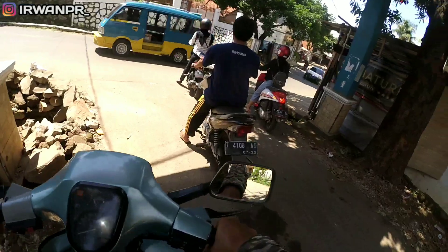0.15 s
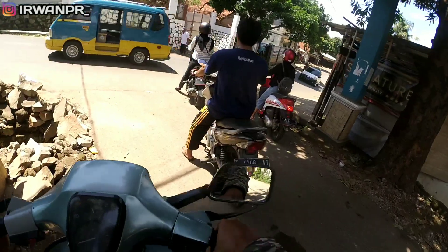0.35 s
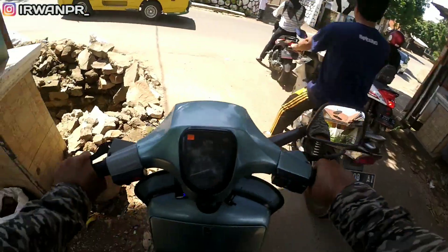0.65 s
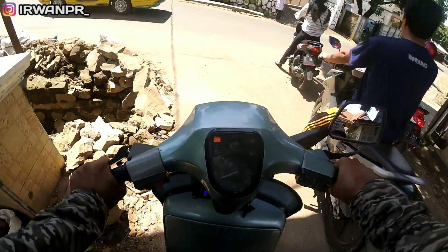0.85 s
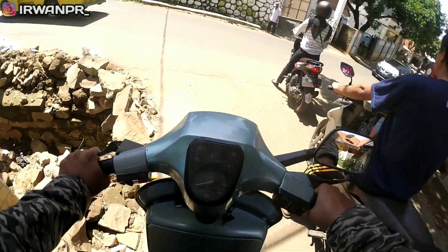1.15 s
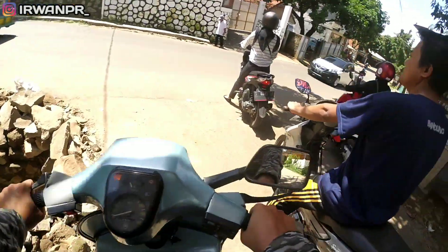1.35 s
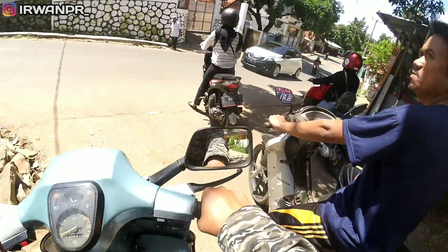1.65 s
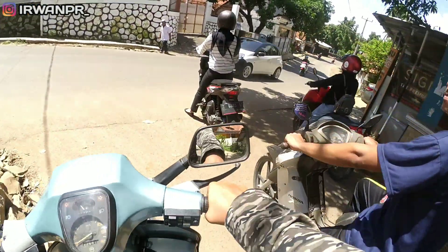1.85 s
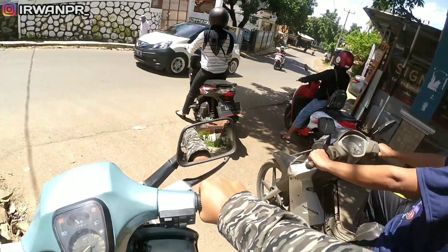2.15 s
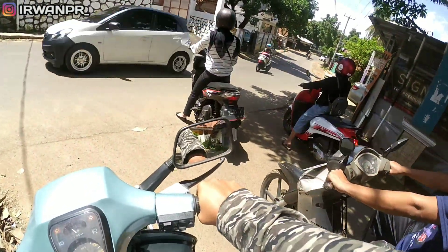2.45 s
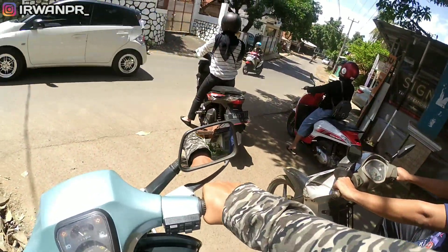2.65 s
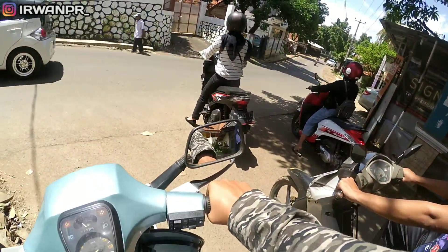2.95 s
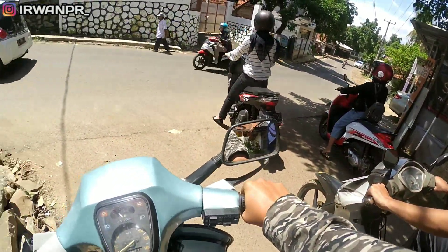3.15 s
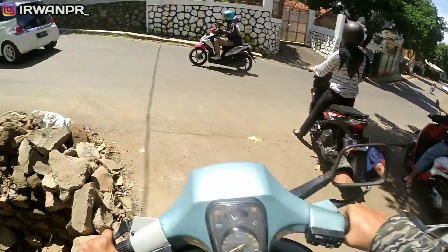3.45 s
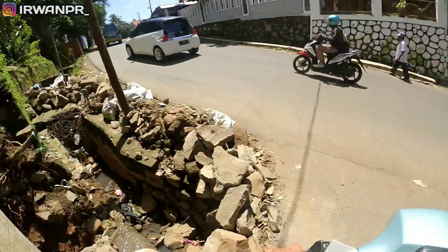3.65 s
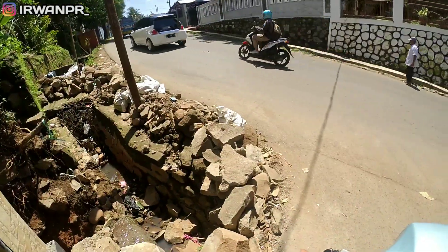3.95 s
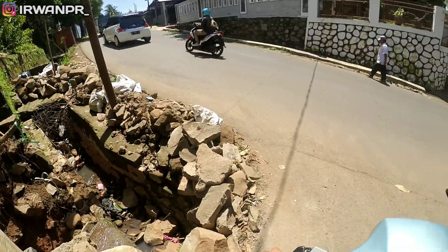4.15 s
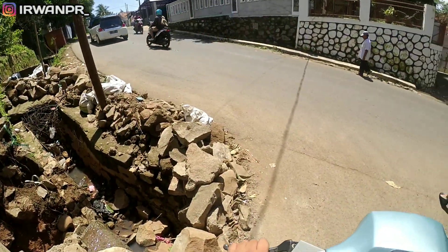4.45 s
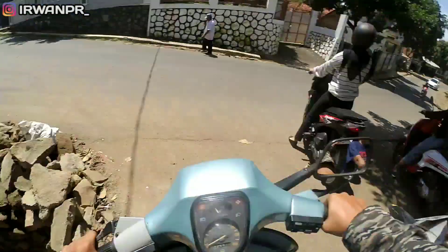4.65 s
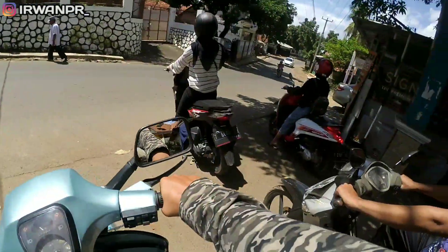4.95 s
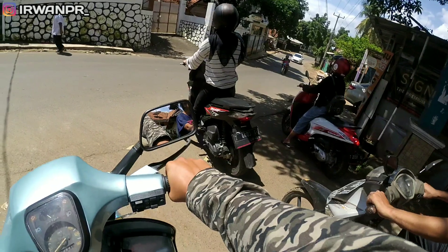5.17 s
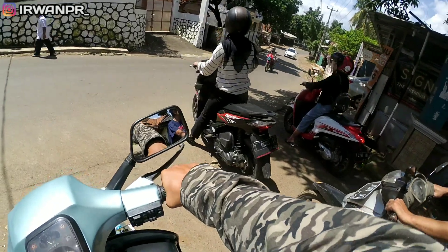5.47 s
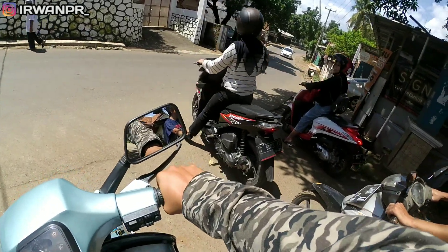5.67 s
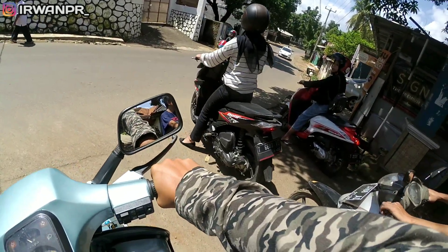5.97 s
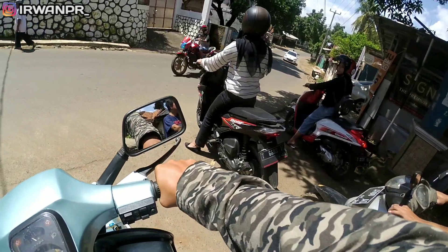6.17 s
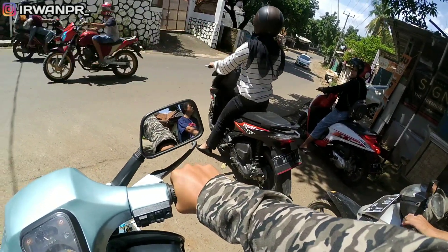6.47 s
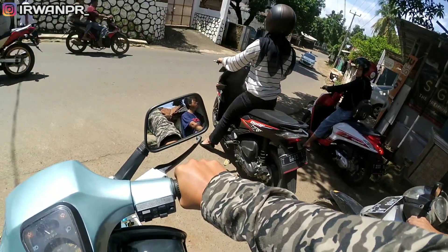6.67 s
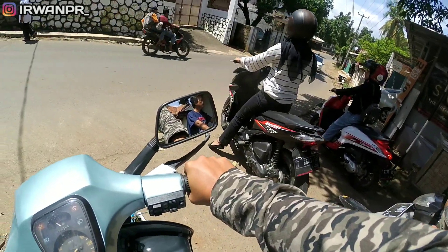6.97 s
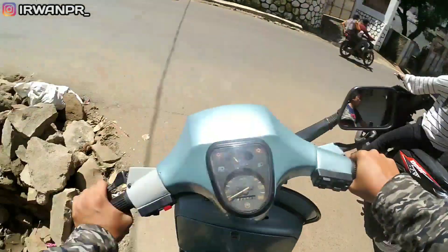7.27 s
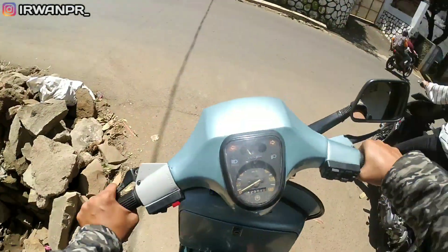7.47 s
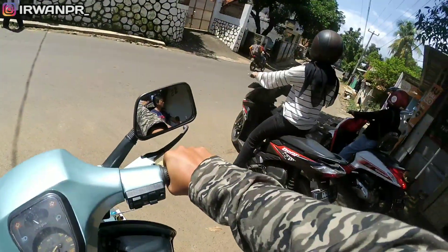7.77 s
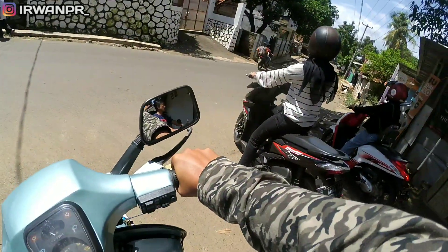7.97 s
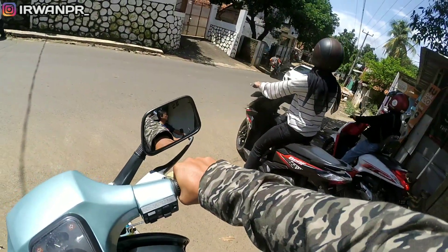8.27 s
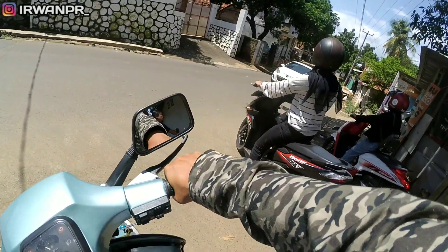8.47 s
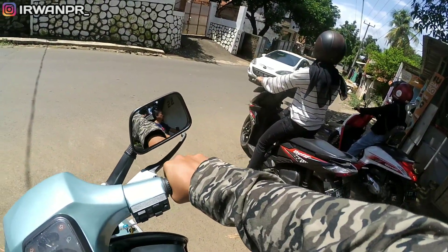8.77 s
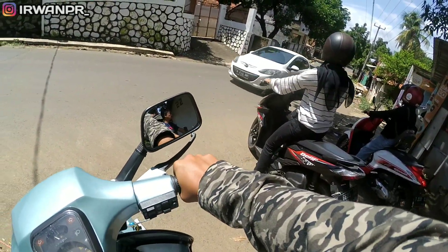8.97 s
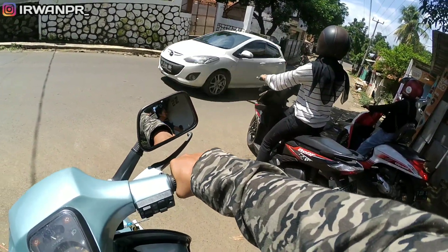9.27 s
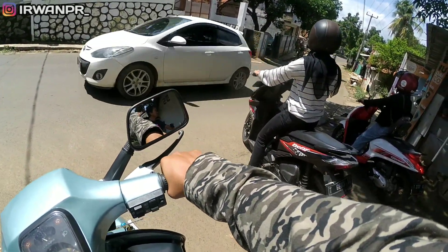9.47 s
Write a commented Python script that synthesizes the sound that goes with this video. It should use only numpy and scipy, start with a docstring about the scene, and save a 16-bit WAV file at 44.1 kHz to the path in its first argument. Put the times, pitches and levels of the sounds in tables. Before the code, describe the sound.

From inside a helmet: an uneven two-stroke scooter idle, a motorbike climbing in pitch, another revving with ticking valves, over low traffic rumble.

```python
"""A motorbike at a village junction revs up, holds and eases off: a stack of tones, ticking valves, a rattle.
A second one pulls away with rising pitch, a van drones past, others blip or hum: stacks of tones too.
The waiting scooter under the helmet microphone idles with uneven pops: short bursts of coloured noise.
Small metal parts clink as dying tones, thin squeaks chirp, and shaped noise makes the traffic.
The helmet muffles engine tones above about 410 Hz."""
import sys
import numpy as np
from scipy import signal
from scipy.fft import rfft, irfft, next_fast_len
from scipy.io import wavfile
from scipy.ndimage import uniform_filter1d, map_coordinates

SR = 44100
rng = np.random.default_rng(int(sys.argv[2]) if len(sys.argv) > 2 else 0)


def output_pcm(signal):
    """Save a mono or channel-first signal as 16-bit PCM at the path in sys.argv[1].

    Samples are clipped to [-1, 1] before scaling.
    """
    pcm = np.clip(np.atleast_2d(signal).T, -1, 1) * 32767
    wavfile.write(sys.argv[1], SR, np.round(pcm).astype(np.int16))


N = 424241
TIME = np.arange(N) / SR
TOP_HZ = 15330  # nothing is kept from here up

# "Order 4" is a tone at 4 times the firing rate. Noise colours are only shapes: the noise is then set to rms 1.

# the revving motorbike; the last two levels are bases for several orders:
# (time [s], firing rate [Hz], order 2 [dB], order 4 [dB], order 6 [dB], order 8 [dB],
#  order 10 and base up to 14 [dB], base of the odd orders [dB])
REVVING = [(2.5, 20.56, -61, -46, -55, -60, -55, -60), (2.75, 22.55, -56, -33, -43, -48, -47, -55),
           (2.95, 25.51, -40, -27, -34, -40, -39, -54), (3.15, 28.27, -43, -28, -35, -35, -42, -50),
           (3.3, 29.1, -37, -27, -42, -33, -46, -45), (3.6, 28.52, -41, -25, -32, -36, -50, -50),
           (3.8, 28.26, -40, -25, -33, -38, -54, -54), (4.05, 28.74, -42, -33, -33, -39, -57, -54),
           (4.3, 32.8, -33, -39, -30, -36, -45, -52), (4.55, 34.2, -32, -39, -32, -44, -54, -55),
           (4.8, 34.37, -35.5, -45, -39, -54, -46, -55), (5.1, 34.97, -39, -40, -37, -54, -52, -55),
           (5.45, 34.64, -41.5, -50, -36, -45, -52, -53), (5.56, 33.91, -41.5, -54, -47, -49, -52, -53),
           (6.1, 33.79, -38.5, -41, -48, -48, -52, -49), (6.55, 33.7, -36.5, -50, -53, -43, -54, -48),
           (6.9, 33.07, -30.5, -46, -45, -46, -52, -44), (7.1, 33.89, -43, -39, -50, -51, -57, -46),
           (7.55, 33.78, -41.5, -39, -50, -51, -59, -45), (7.8, 33.08, -42.5, -50, -56, -56, -58, -54),
           (8.2, 32.3, -38.5, -55, -56, -50, -56, -54)]
# its valve ticking, whose colour changes as the helmet turns:
# (time [s], first colour [dB], second colour [dB], third colour [dB])
TICKING = [(2.5, -84, -85, -66), (2.85, -73, -72, -74), (3.1, -63, -78, -76), (3.55, -67, -65, -62),
           (3.95, -70, -66.5, -75), (4.1, -66, -59, -62), (4.27, -75, -64, -68), (4.4, -85, -62.5, -76),
           (4.8, -93, -67.5, -84), (5.8, -92, -84, -81), (6.4, -89, -74, -67.5), (6.82, -68, -67, -66.5),
           (7.05, -78, -74, -74), (7.25, -78, -75, -89), (8.3, -87, -90, -90)]
# first tick colour: (frequency [Hz], level [dB])
FACING_COLOUR = [(2800, -8), (3800, -1), (5000, -14), (9200, -13), (10200, -7.5), (11000, -13),
                 (12000, -27)]
# second tick colour: (frequency [Hz], level [dB])
VALVE_COLOUR = [(2900, -19), (3800, -1.5), (5400, 1), (6350, 2.5), (6900, -4), (7450, 3), (9500, -14),
                (13000, -37)]
# third tick colour: (frequency [Hz], level [dB])
CASING_COLOUR = [(1800, -18), (2200, 6), (2650, -12), (3100, -10), (3600, -6), (4200, -22)]
TICK_BED = .075  # steady rasp that fills the gaps between ticks
# a cover plate buzzes twice a turn; its level is relative to the first tick colour
COVER_HZ, COVER_T60_S, COVER_DB = 3810, .035, -2.5
# the hard edge of each tick; its level is relative to the second tick colour
TAPPET_HZ, TAPPET_T60_S, TAPPET_DB = 5800, 0.0089, -4.5
# orders 17 and 27 over the rasp level, and how strongly they come and go
HIGH_ORDERS_DB, COME_AND_GO_DB = 9.5, 5
SINGS_HZ, SINGS_DB_PER_HZ = 33, 5  # below this firing rate those two orders fade
# a loose metal part ringing with the firings: (start [s], length [s], level [dB])
RATTLE = [(7.599, 0.39, -74), (8.391, 0.37, -73)]
RATTLE_HZ = 9200

# the motorbike pulling away, bases for nearby orders:
# (time [s], order 4 and base of 8 [dB], order 5 and base of 9 [dB], base of the orders over 9 [dB])
LEAVING = [(0, -45, -44, -55.5), (.6, -38.5, -35, -52), (1.2, -49, -46, -52.5), (1.6, -53, -40, -52),
           (2.1, -46, -35, -54), (2.7, -37, -38, -53.5), (3.0, -41, -43, -50), (3.5, -38, -52, -55),
           (3.9, -42, -60, -64), (4.2, -54, -65, -75)]
LEAVING_HZ, LEAVING_HZ_PER_S = 21.7, 4.4  # firing rate at the start, and its even climb
MIDDLE_DB = -11  # base of its weak orders 6 and 7, relative to order 4
# its bark, before a 2 dB cut: (time [s], level [dB])
BARK = [(0, -90), (.7, -61), (1.1, -55.5), (1.6, -91), (2.1, -65), (2.45, -53), (2.8, -63), (3.5, -60),
        (4.2, -91)]
# colour of a bark, for this motorbike and the scooter: (frequency [Hz], level [dB])
PIPE_COLOUR = [(600, -43), (900, -4.5), (1350, -1), (1700, -8), (2300, -20)]
# the pipe's ring at each bark, and the gas noise relative to it
PIPE_MODES_HZ, PIPE_T60_S, HOARSE_DB = (1000, 1410), 0.013, -3

# the van: (time [s], firing rate [Hz], order 2 [dB], orders 4 and up relative to it, as a base [dB])
VAN = [(.3, 38.65, -67, -12), (.9, 40.02, -34.5, -6.5), (1.4, 40.87, -39.5, 1.5), (1.7, 38.6, -33.5, -5),
       (2.1, 37.6, -54, -16)]

# the scooter's clearest single firings at idle: (time [s], base level of the pop's parts [dB])
POPS = [(0.1544, -44.5), (0.619, -47), (0.7687, -48), (1.6025, -42.5), (1.7435, -43), (1.8472, -46),
        (1.9475, -44), (2.2149, -45), (2.328, -45.5), (2.4043, -49), (2.6094, -48), (4.4787, -44),
        (4.6394, -45), (5.0474, -46.5), (5.5568, -47), (5.6894, -53), (6.0392, -48), (6.3494, -48),
        (6.4294, -46), (6.5914, -42), (7.0853, -44), (7.7603, -45.5), (8.5294, -45), (8.6896, -44),
        (9.382, -46.5), (9.5103, -49)]
# firings in a row: (start [s], gap [s], base level [dB], count)
POP_RUNS = [(.882, .0605, -51, 5), (7.98, .0615, -50, 4), (8.235, .055, -50, 5), (9.052, .058, -49, 5)]
STRAY_PER_S, STRAY_DB = 1.8, -49.5  # weak firings in between, by chance; level is the middle of the range
# colour of a pop's crack: (frequency [Hz], level [dB])
CRACK_COLOUR = [(1200, -23), (2000, -2.5), (3100, 0), (4700, -11.5), (5800, -11), (8500, -4.5),
                (11500, -14), (15000, -33)]
TINK_HZ, TINK_DB = 5520, -19  # a small metal part rings with each pop; level relative to the pop's base
# one short hoarse scuff: (start [s], length [s], centre [Hz], level [dB])
SCUFF = (.105, .08, 1380, -50)

# an engine nearby blips its throttle:
# (start [s], length [s], firing rate from [Hz], firing rate to [Hz], order 4 and base of 5 and 7 [dB])
BLIPS = [(7.818, 0.481, 32, 38.9, -44.5), (8.277, 0.32, 38.73, 45.85, -45), (8.917, .55, 32.95, 46.9, -43)]
# a far engine, heard by two orders: (time [s], firing rate [Hz], base level [dB])
FAR_ENGINE = [(6.9, 41.72, -76), (7.5, 41.57, -45.5), (8.1, 41.87, -51.5), (8.7, 42.2, -58.5)]
# an idling hum: (time [s], base tone [Hz], orders 1 and 2 and base of 10 [dB])
IDLING_HUM = [(0, 29.17, -48.5), (.6, 27.97, -42.5), (1.5, 27.6, -53), (2.2, 26.75, -42), (2.8, 27.1, -52)]

# small metal parts clink, before a 3 dB cut: (start [s], level [dB], lower tone [Hz], 60 dB decay [s])
CLINKS = [(.416, -51, 8270, .01), (.535, -55, 6500, .008), (1.3763, -45, 6100, .012),
          (1.846, -46, 2892, .03), (1.85, -60, 8230, 0.042), (2.031, -50, 9800, .005),
          (2.106, -49, 11500, .008), (2.84, -56, 10200, .04), (3.075, -57, 9900, 0.049),
          (3.148, -55, 9990, .05), (3.244, -52, 5613, .012), (3.7414, -47, 5530, .015),
          (4.4044, -44, 5850, .015), (4.8454, -40, 6385, .012), (4.9472, -41, 6024, .012),
          (6.5892, -36, 7763, .012), (6.594, -46, 2460, .04), (6.59, -56, 5500, .06),
          (6.589, -43, 2158, 0.049), (9.1721, -52, 5510, .035), (9.2289, -56, 5550, .035),
          (9.3594, -50, 8000, .012)]
# a quick run of thin ticks: (start [s], gap [s], count)
CHATTER = (1.04, .0146, 19)
CHATTER_DB = -56  # typical tick
# thin squeaks at the top of hearing, each a flurry of short rising chirps; pitch and level are bases:
# (start [s], length [s], base pitch [Hz], base level [dB])
SQUEAKS = [(3.63, 0.19, 13900, -80), (5.688, .15, 14100, -83), (8.06, .07, 14500, -86)]

# traffic: (time [s], rumble [dB], hiss [dB])
TRAFFIC = [(0, -29.5, -60.5), (.4, -36.5, -63.5), (.9, -32.5, -63), (2.2, -36.5, -62), (2.68, -36.5, -60.5),
           (2.9, -30.5, -59.5), (3.25, -35, -58), (3.6, -36.5, -57), (4, -36, -59.5), (4.3, -31.5, -56.5),
           (5.1, -35.5, -61.5), (6.1, -34.5, -62.5), (6.75, -33, -57), (7.2, -36.5, -61.5), (7.9, -36, -64),
           (8.4, -33.5, -62), (8.85, -37, -65.5), (9.2, -33.5, -63), (9.62, -34.5, -62)]
# colour of the rumble: (frequency [Hz], level [dB])
RUMBLE_COLOUR = [(8.8, -32), (15, -3.5), (69, 4.5), (107, 1.5), (125, 3.5), (181, 0), (303, -2.5),
                 (380, -12), (399, -22), (439, -17), (700, -33.5), (910, -80)]
# colour of the road noise: (frequency [Hz], level [dB])
ROAD_COLOUR = [(240, -17), (400, -2.5), (496, -9), (643, -13), (1310, -10.5), (1760, -27), (2190, -47),
               (2500, -41), (3250, -66)]
# colour of the hiss: (frequency [Hz], level [dB])
HISS_COLOUR = [(880, -24), (1500, 2), (1770, -4), (2230, -3), (2710, -9.5), (3100, -5.5), (3380, -9.5),
               (3690, -7.5), (4890, -17.5), (5650, -11.5), (6860, -15), (8410, -13), (12400, -25),
               (15200, -30)]
# colour of a throaty rasp among the engines: (frequency [Hz], level [dB])
THROAT_COLOUR = [(490, -9), (580, 4.5), (660, -13), (760, -1), (840, -5.5), (920, 1), (1060, -38)]
# level of that rasp: (time [s], level [dB])
RASP = [(.4, -67), (1.0, -52), (1.4, -64), (3.4, -57), (3.9, -67), (4.25, -54.5), (5.1, -60), (5.8, -73.5),
        (6.8, -55.5), (7.5, -58), (8.0, -71)]
ROAD_DB, ROAD_FOLLOWS = -54, 0.52  # road noise at a hiss of -62 dB, and dB it gains per dB of hiss


def amp(db):
    """Decibels to gain."""
    return 10 ** (np.asarray(db) / 20)


def unit(x):
    """Scaled to rms 1."""
    return x / np.sqrt(np.mean(x ** 2) + 1e-20)


def curves(rows):
    """One value per sample for each column after the time."""
    s, *cols = np.transpose(rows)
    return [np.interp(TIME, s, c) for c in cols]


def heard(rows):
    """1 while a source's table lasts, fading over .15 s just before and after it."""
    since_start, to_end = TIME - rows[0][0], rows[-1][0] - TIME
    return np.clip(np.minimum(since_start, to_end) / .15 + 1, 0, 1)


def swell(start_s, length_s):
    """Half a sine, once."""
    return np.sin(np.pi * np.clip((TIME - start_s) / length_s, 0, 1))


def wobble(rate):
    """A smooth random curve through `rate` random points a second."""
    return map_coordinates(rng.standard_normal(int(N * rate / SR) + 4), [TIME * rate])


def filtered(x, response):
    """The sound with each frequency scaled by the response."""
    m = next_fast_len(N + 8192)
    return irfft(rfft(x, m) * response(np.fft.rfftfreq(m, 1 / SR)), m)[..., :N]


def noise(points, patchy_db=0.):
    """Noise of rms 1 in a given colour, with random louder and softer patches in time and pitch."""
    z = signal.stft(rng.standard_normal(N), nperseg=1024)[2]
    across_pitch = uniform_filter1d(rng.standard_normal(z.shape), 8, 0)
    patches = unit(uniform_filter1d(across_pitch, 5, 1))
    patchy = signal.istft(z * amp(patchy_db * patches), nperseg=1024)[1][:N]
    f, db = np.transpose(points)

    def colour(hz):
        return amp(np.interp(np.log(hz + 1), np.log(f + 1), db, -120, -120))
    return unit(filtered(patchy, colour))


def narrow(hz, below_hz, above_hz):
    """A narrow band of noise around one pitch."""
    return noise([(hz - below_hz, -30), (hz, 0), (hz + above_hz, -30)])


def bursts(times, gains, rise_s, fall_s):
    """An envelope that swells softly at each time and dies away."""
    t = np.arange(SR // 10) / SR
    kicks = np.bincount(np.round(times * SR).astype(int), gains, N)[:N]
    shape = (1 - np.exp(-t / rise_s)) ** 2 * np.exp(-t / fall_s)
    return signal.fftconvolve(kicks, shape)[:N]


def strokes(turns, one_at_s):
    """The times at which turns, counted from a known stroke, passes a whole number."""
    counted = turns - np.interp(one_at_s, TIME, turns)
    return TIME[1:][np.diff(np.floor(counted)) > 0]


def rings(times, gains, hz, t60, spread):
    """A damped sine at each time, its pitch a little new each blow; all set to rms 1."""
    t = np.arange(SR // 25) / SR
    pitch = hz * (1 + spread * rng.standard_normal((len(times), 1)))
    tones = gains[:, None] * amp(-60 * t / t60) * np.sin(2 * np.pi * pitch * t)
    at = np.round(times * SR).astype(int)[:, None] + np.arange(len(t))
    return unit(np.bincount(at.ravel(), tones.ravel(), N)[:N])


def exhaust(hz, levels, waver_db, drift):
    """Tones at multiples of the firing rate, wavering as the echoes of the street change."""
    turns = np.cumsum(hz) / SR
    out = 0
    for k, db in levels:
        muffled_db = -.12 * np.clip(k * hz - 410, 0, 170)  # the helmet dims the high orders
        gain = np.sqrt(2) * amp(db + muffled_db + waver_db * wobble(5.4))
        phase = 2 * np.pi * k * turns + 0.1007 * k * k + drift * wobble(3.3)
        out = out + gain * np.cos(phase)
    return out


def random_gains(times, spread_db):
    """A random gain for each stroke."""
    return amp(spread_db * rng.standard_normal(len(times)))


def valve_ticking(hz, at):
    """The valve gear knocks once a turn: hissy ticks in three colours, a buzzing cover and a hard edge."""
    ticks = TICK_BED + bursts(at, random_gains(at, 1.8), rise_s=.0007, fall_s=.004)
    levels_db = curves(TICKING)
    out = 0
    for db, colour in zip(levels_db, (FACING_COLOUR, VALVE_COLOUR, CASING_COLOUR)):
        out = out + amp(db) * unit(ticks * noise(colour, patchy_db=2.5))
    buzz = strokes(4 * np.cumsum(hz) / SR, 4.0735)
    buzz_size = random_gains(buzz, 3) * np.where(np.isin(buzz, at), 1, .38)  # weaker between ticks
    cover = rings(buzz, buzz_size, COVER_HZ, COVER_T60_S, spread=.035)
    edge = rings(at, random_gains(at, 1), TAPPET_HZ, TAPPET_T60_S, spread=0.202)
    return out + amp(levels_db[0] + COVER_DB) * cover + amp(levels_db[1] + TAPPET_DB) * edge


def rattle(firings):
    """A loose metal part rings with the firings."""
    firing = bursts(firings, random_gains(firings, 1.5), rise_s=0.0014, fall_s=0.01)
    level = sum(amp(db) * swell(s, span) for s, span, db in RATTLE)
    return level * unit(firing * narrow(RATTLE_HZ, 500, 400))


def revving():
    """A four-stroke single: the crank turns twice a firing, so even orders lead and the valves tick each turn."""
    hz, second, fourth, sixth, eighth, tenth, odd = curves(REVVING)
    evens = [(2, second), (4, fourth), (6, sixth), (8, eighth), (10, tenth), (12, tenth - 8), (14, tenth - 4)]
    odds = [(1, odd + 4), (3, odd - 2), (5, odd + 2), (7, odd), (9, odd), (11, odd - 10)]
    fade_db = SINGS_DB_PER_HZ * np.minimum(hz - SINGS_HZ, 0)
    high_db = curves(RASP)[0] + HIGH_ORDERS_DB + fade_db
    highs = [(k, high_db + COME_AND_GO_DB * wobble(2)) for k in (17, 27)]
    tones = exhaust(hz, evens + odds + highs, waver_db=1, drift=.2)
    at = strokes(2 * np.cumsum(hz) / SR, 4.0735)
    return heard(REVVING) * (tones + valve_ticking(hz, at)) + rattle(at[::2])


def pipe_bark(hz):
    """Every firing barks twice in the pipe, the second an echo from its end."""
    at = strokes(np.cumsum(hz) / SR, 2.4355)
    size = random_gains(at, 1.5)
    times, gains = np.r_[at, at + .0075], np.r_[size, .9 * size]
    hoarse = amp(HOARSE_DB) * unit(bursts(times, gains, rise_s=.0008, fall_s=.004) * noise(PIPE_COLOUR))
    ring = unit(sum(rings(times, gains, mode, PIPE_T60_S, spread=0.057) for mode in PIPE_MODES_HZ))
    return amp(curves(BARK)[0] - 2) * (ring + hoarse)


def leaving():
    """A long stack of orders that climbs evenly, with a barking pipe and a noisy growl."""
    low, fifth, high = curves(LEAVING)
    hz = LEAVING_HZ + LEAVING_HZ_PER_S * TIME
    middle = low + MIDDLE_DB
    lows = [(3, low - 8), (4, low), (5, fifth)]
    middles = [(6, middle - 1), (7, middle), (8, low - 4), (9, fifth - 6)]
    highs = [(10, high - 5), (11, high + 2), (12, high + 4), (13, high + 3), (14, high - 10)]
    highs += [(k, high - 3) for k in range(15, 20)]
    tones = exhaust(hz, lows + middles + highs, waver_db=2.1, drift=.35)
    # turbulence in the silencer
    growl = amp(high) * noise([(300, -15), (420, 0), (500, -12), (620, -30)])
    return heard(LEAVING) * (tones + pipe_bark(hz) + growl)


def van():
    """A short stack of low orders."""
    hz, second, upper_db = curves(VAN)
    upper = second + upper_db
    levels = [(2, second), (3, second - 8), (4, upper), (5, upper - 5), (6, upper)]
    return heard(VAN) * exhaust(hz, levels, waver_db=1.5, drift=.3)


def idling():
    """Each two-stroke pop is a puff of gas: a soft crack, a bark of the pipe, a dull thump and a tiny ring."""
    in_runs = [(s + k * gap, db) for s, gap, db, count in POP_RUNS for k in range(count)]
    when, size = rng.random((round(STRAY_PER_S * N / SR), 2)).T
    strays = np.c_[.01 + .99 * when * TIME[-1], STRAY_DB + 6 * (size - .5)]
    s, db = np.vstack([POPS, in_runs, strays]).T
    early = s - .003  # the softer rises start 3 ms sooner
    crack = bursts(early, amp(db - 6.0), rise_s=0.0022, fall_s=0.0075) * noise(CRACK_COLOUR, patchy_db=1.5)
    bark = bursts(early, amp(db - 3.0), rise_s=0.0023, fall_s=0.012) * noise(PIPE_COLOUR)
    dull = noise([(40, -42), (100, 19), (300, 7), (500, -49.0)])
    thump = bursts(s, amp(db - 13.0), rise_s=0.0013, fall_s=0.022) * dull
    tink = bursts(s, amp(db + TINK_DB), rise_s=.001, fall_s=0.0073) * narrow(TINK_HZ, 350, 350)
    return crack + bark + thump + tink


def scuff():
    """One swell of narrow hoarse noise."""
    s, span, hz, db = SCUFF
    return amp(db) * swell(s, span) * narrow(hz, 500, 500)


def blips():
    """Each blip sweeps a few low orders upward."""
    out = 0
    for s, span, from_hz, to_hz, db in BLIPS:
        hz = np.interp(TIME, [s, s + span], [from_hz, to_hz])
        levels = [(4, db), (5, db - 4), (7, db - 6)]
        out = out + swell(s, span) ** .5 * exhaust(hz, levels, waver_db=1.5, drift=.3)
    return out


def hums():
    """Two faint engines of nearly steady pitch, each a few orders."""
    far_hz, far_db = curves(FAR_ENGINE)
    far = exhaust(far_hz, [(6, far_db + 5.0), (9, far_db - 13.5)], waver_db=1.5, drift=0.13)
    hz, db = curves(IDLING_HUM)
    idle = exhaust(hz, [(1, db), (2, db), (10, db - 2.5)], waver_db=2.5, drift=0.5)
    return heard(FAR_ENGINE) * far + heard(IDLING_HUM) * idle


def clinks():
    """Each clink is a close pair of modes dying away."""
    out, t = np.zeros(N + SR), np.arange(SR // 10) / SR
    for (s, db, hz, t60), (beat, turn) in zip(CLINKS, rng.random((len(CLINKS), 2))):
        upper_hz = hz * (1.02 + 0.022 * beat)
        pair = np.sin(2 * np.pi * hz * t) + .6 * np.sin(2 * np.pi * (upper_hz * t + turn))
        onset = 1 - np.exp(-10 * t / t60 - 300 * t)
        out[round(s * SR):][:len(t)] += amp(db - 3 - 60 * t / t60) * onset * pair
    return out[:N]


def chatter():
    """A train of thin hissy ticks."""
    s, gap, count = CHATTER
    sizes = amp(CHATTER_DB + 2.57 * rng.standard_normal(count))
    gate = bursts(s + gap * np.arange(count), sizes, rise_s=0.0006, fall_s=0.0013)
    return gate * noise([(7000, -15), (8500, -3), (9800, -15), (11300, -6), (12500, -30)])


def squeaks():
    """Hoarse chirps of about 20 ms that glide upward in a puff of high hiss."""
    out, t = np.zeros(N + SR), np.arange(SR // 25) / SR
    for s, span, hz, db in SQUEAKS:
        for when, pitch, size, life in rng.random((24, 4)):
            hoarse = .012 * np.cumsum(rng.standard_normal(len(t)))  # phase wanders at random
            glide = hz * (0.84 + .14 * pitch) * t + 12000 * t ** 2 + hoarse
            shape = np.sin(np.pi * np.clip(t / (.008 + .02 * life), 0, 1)) ** 2
            chirp = amp(db + 10 * size) * shape * np.sin(2 * np.pi * glide)
            out[round((s + span * when) * SR):][:len(t)] += chirp
    puff = sum(amp(db + 10) * swell(s, span) ** .5 for s, span, hz, db in SQUEAKS)
    return out[:N] + puff * noise([(11500, -30), (13000, -13), (15000, 0)], patchy_db=6)


def traffic():
    """Far engines blur into rumble; tyres and fans into road noise and hiss; a throaty rasp comes and goes."""
    rumble_db, hiss_db = curves(TRAFFIC)
    road_db = ROAD_DB + ROAD_FOLLOWS * (hiss_db + 62)
    flutter = wobble(15) + 1.5 * wobble(40)  # shared by road noise and hiss
    rumble = amp(rumble_db + 0.28 * wobble(5.8)) * noise(RUMBLE_COLOUR, patchy_db=.5)
    road = amp(road_db + 0.23 * flutter) * noise(ROAD_COLOUR, patchy_db=1.0)
    rasp = heard(RASP) * amp(curves(RASP)[0] + 2.8 * wobble(22)) * noise(THROAT_COLOUR, patchy_db=2)
    hiss = amp(hiss_db + 0.4 * flutter) * noise(HISS_COLOUR, patchy_db=1.0)
    return rumble + road + rasp + hiss


def scene():
    """All sources added up; one microphone feeds both channels."""
    engines = revving() + leaving() + van() + idling() + blips() + hums()
    small_parts = scuff() + clinks() + chatter() + squeaks()
    mono = engines + small_parts + traffic()
    return np.array([mono, mono])


def record(dry):
    """Nothing at or above the band limit is kept."""
    return filtered(dry, lambda hz: hz < TOP_HZ)


dry = scene()
out = record(dry)
output_pcm(out)
```